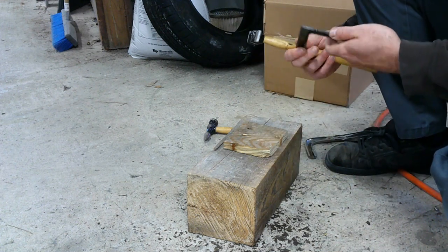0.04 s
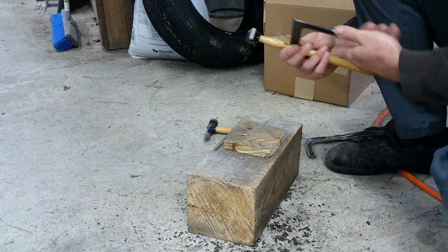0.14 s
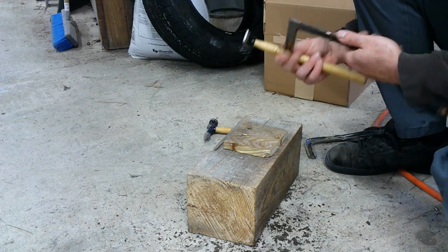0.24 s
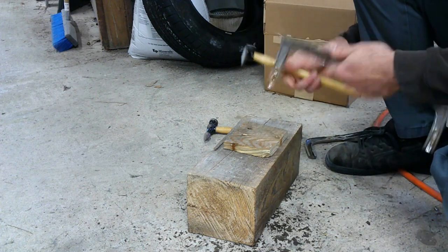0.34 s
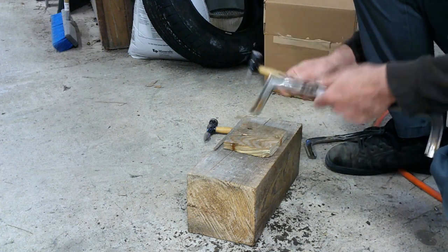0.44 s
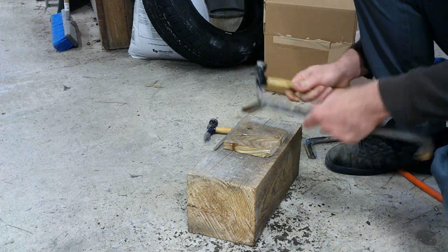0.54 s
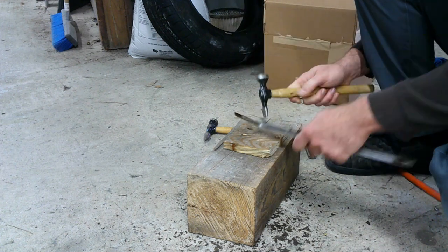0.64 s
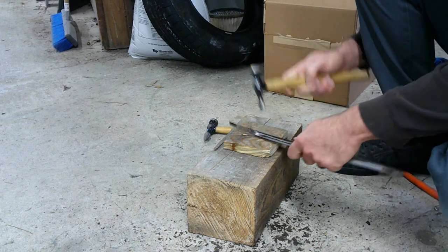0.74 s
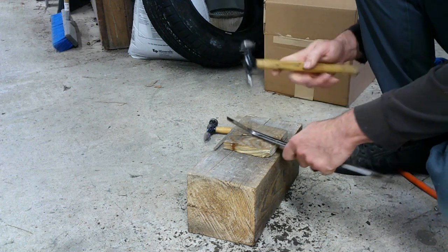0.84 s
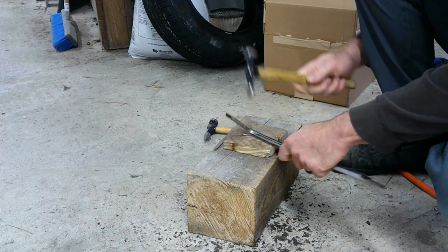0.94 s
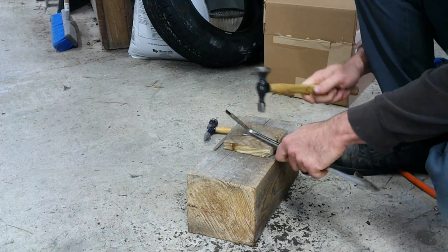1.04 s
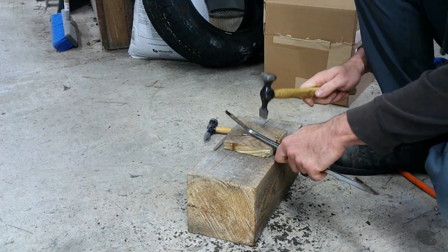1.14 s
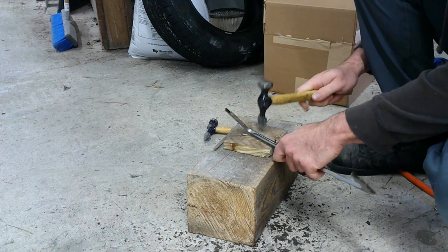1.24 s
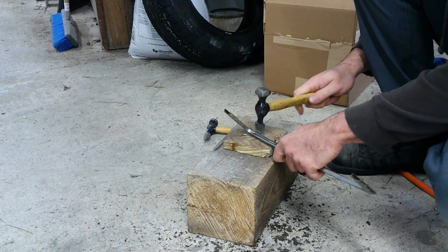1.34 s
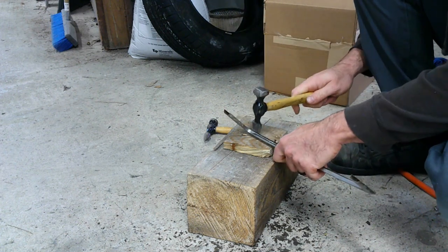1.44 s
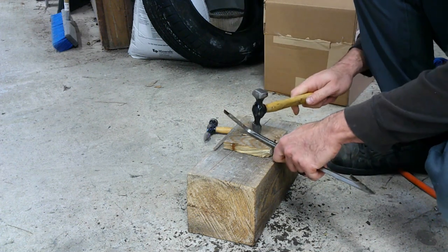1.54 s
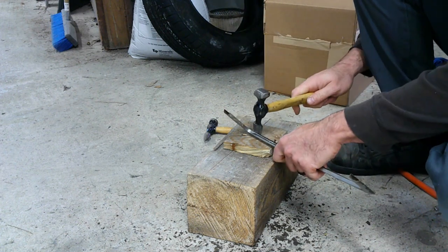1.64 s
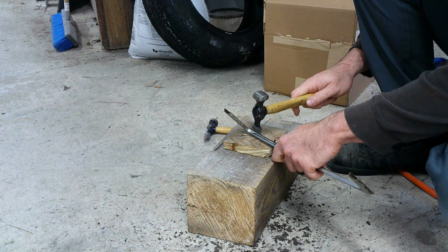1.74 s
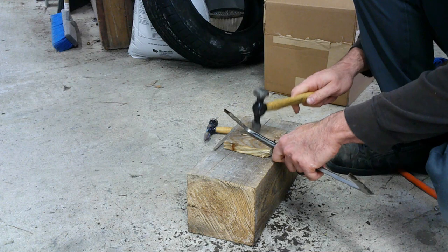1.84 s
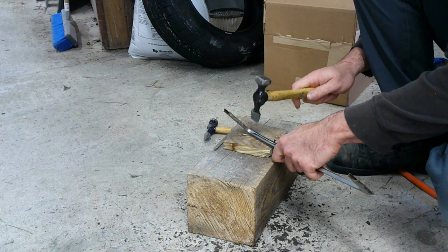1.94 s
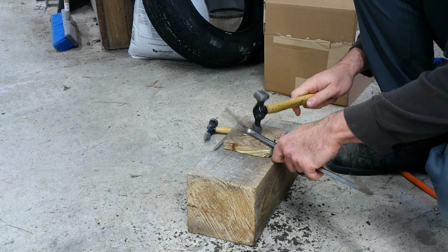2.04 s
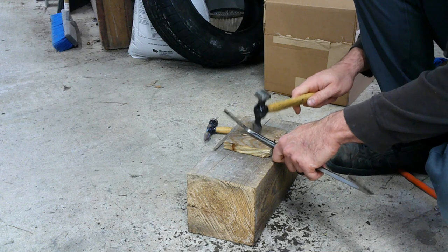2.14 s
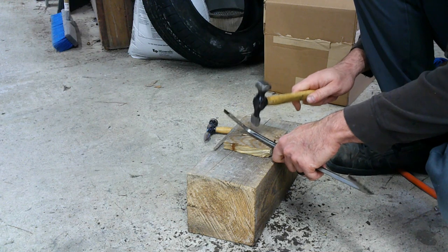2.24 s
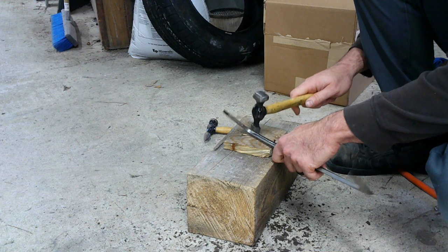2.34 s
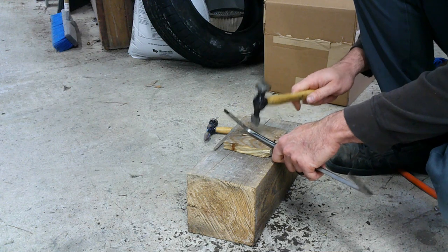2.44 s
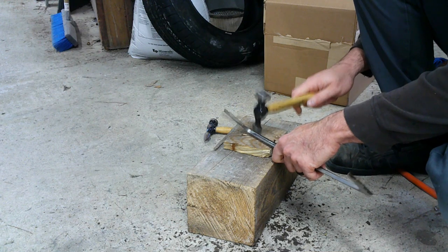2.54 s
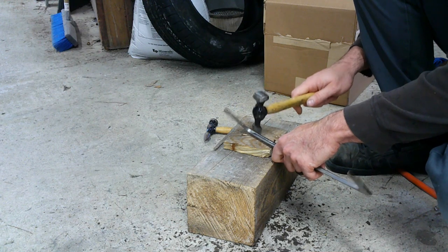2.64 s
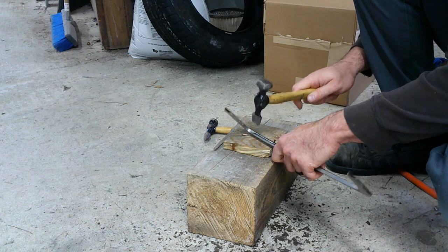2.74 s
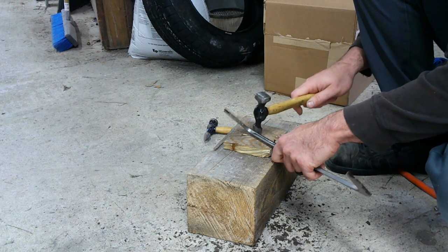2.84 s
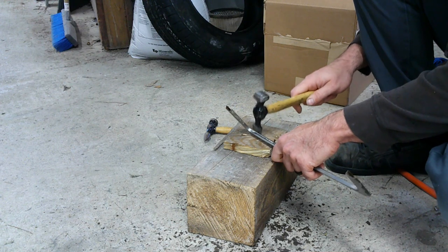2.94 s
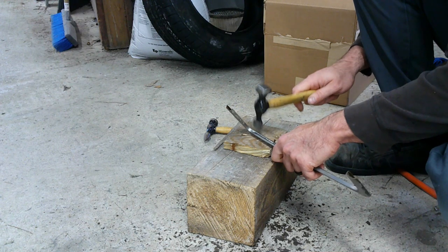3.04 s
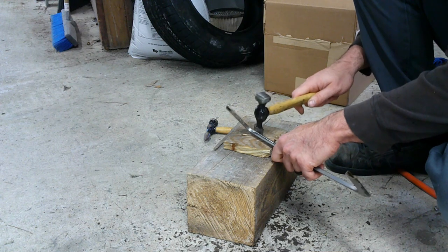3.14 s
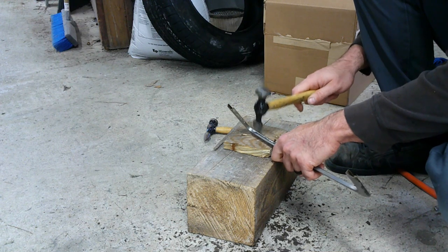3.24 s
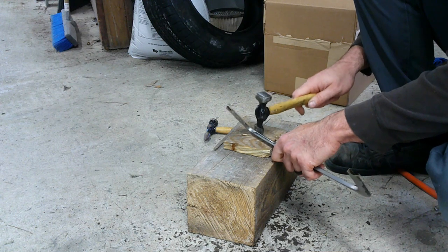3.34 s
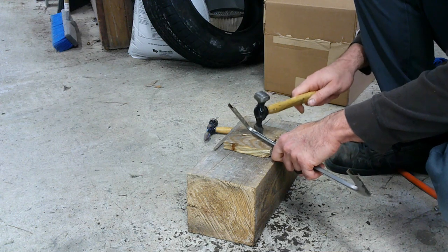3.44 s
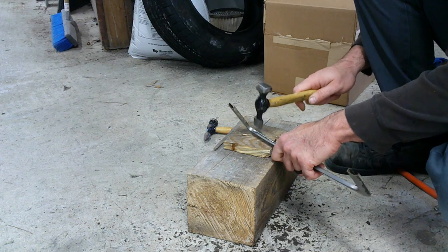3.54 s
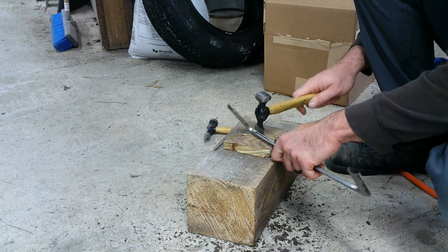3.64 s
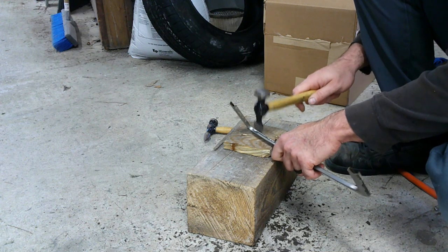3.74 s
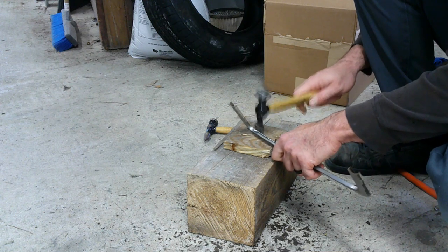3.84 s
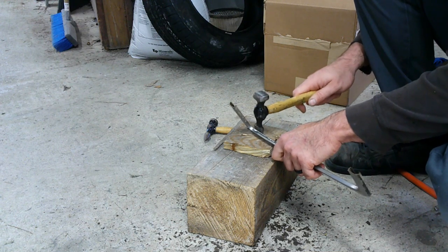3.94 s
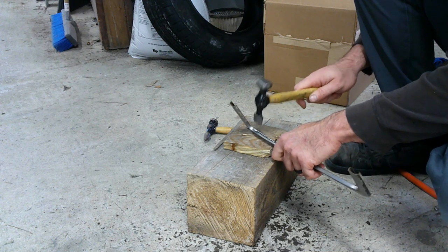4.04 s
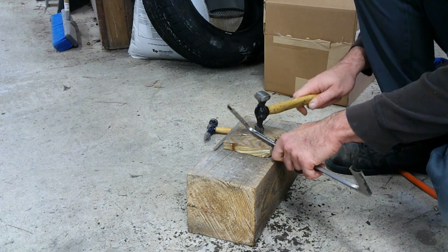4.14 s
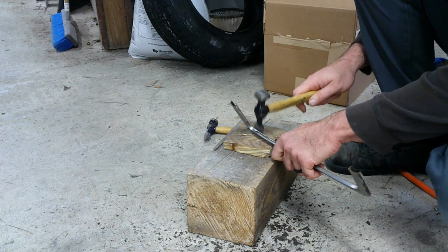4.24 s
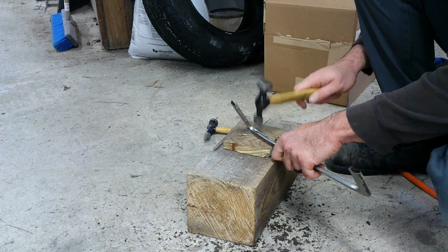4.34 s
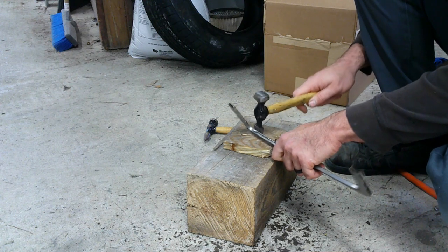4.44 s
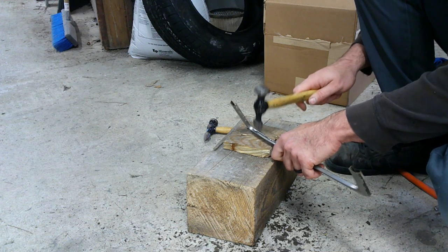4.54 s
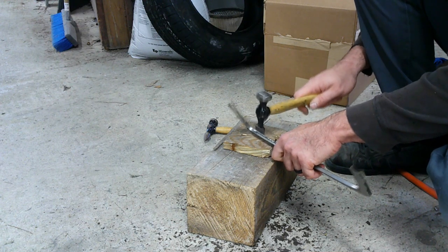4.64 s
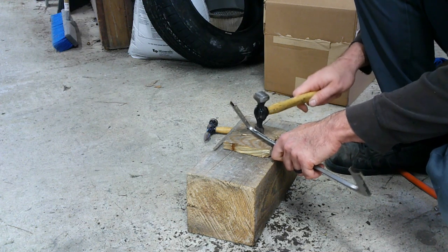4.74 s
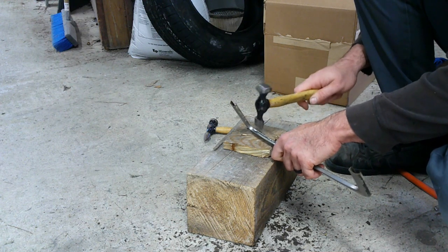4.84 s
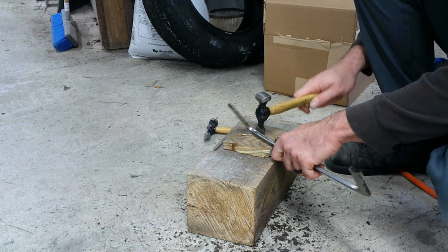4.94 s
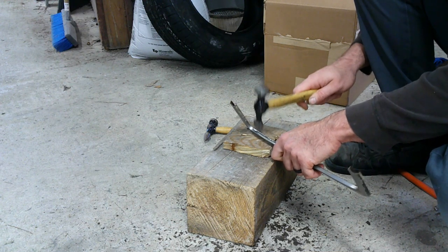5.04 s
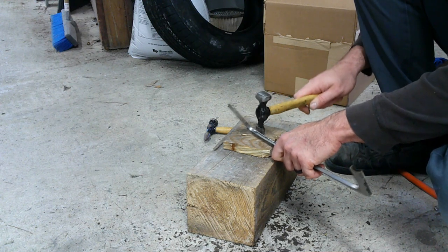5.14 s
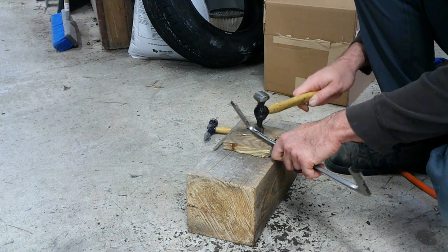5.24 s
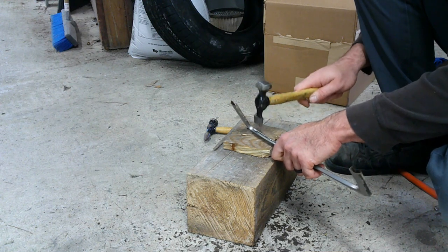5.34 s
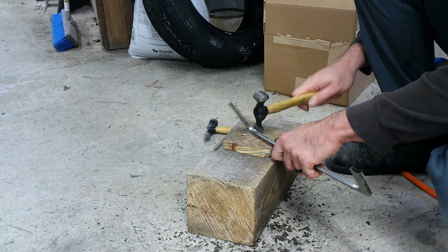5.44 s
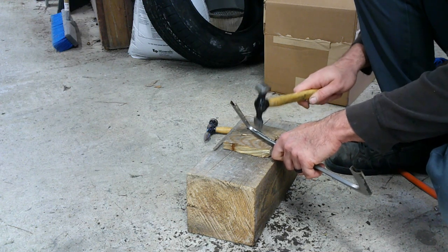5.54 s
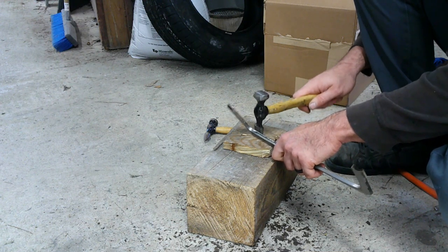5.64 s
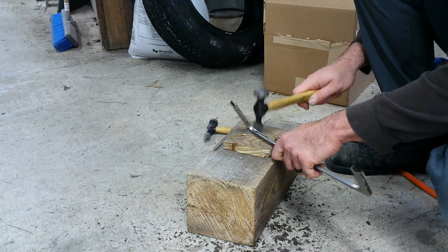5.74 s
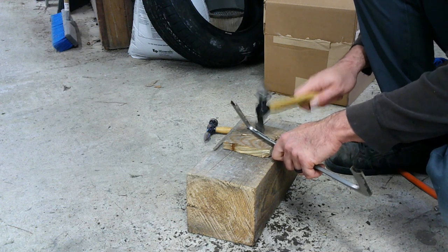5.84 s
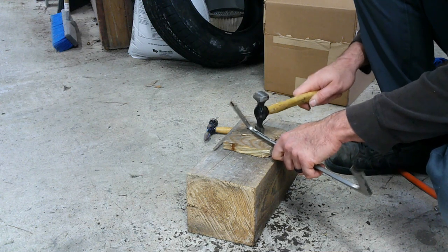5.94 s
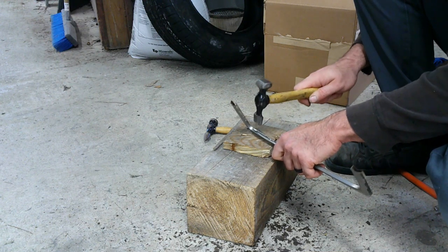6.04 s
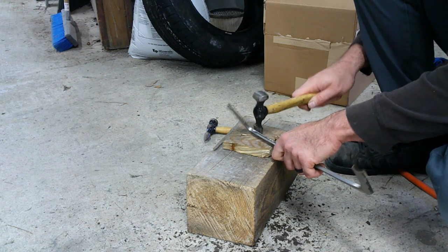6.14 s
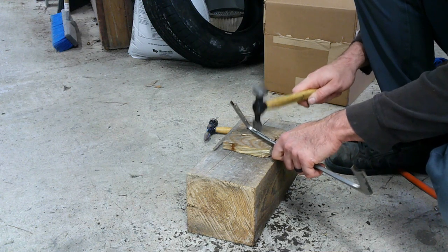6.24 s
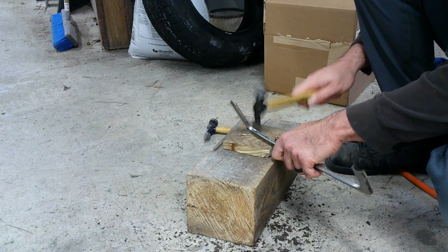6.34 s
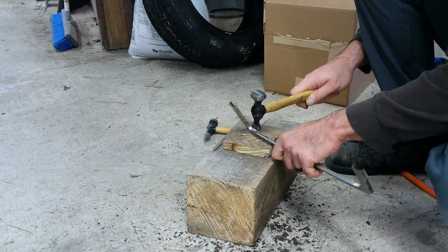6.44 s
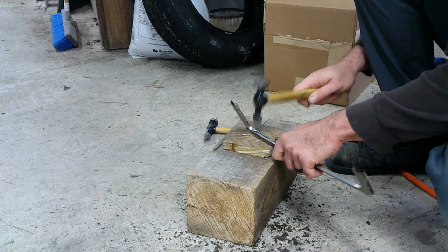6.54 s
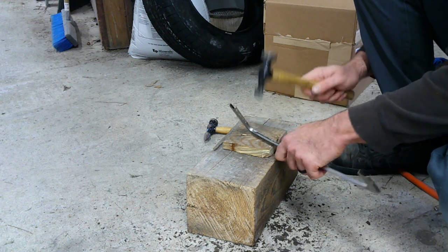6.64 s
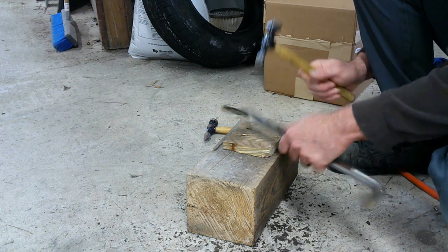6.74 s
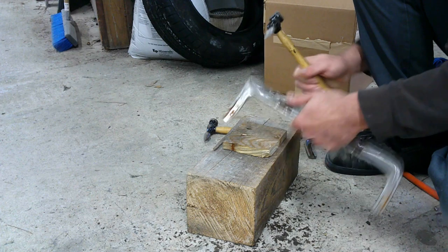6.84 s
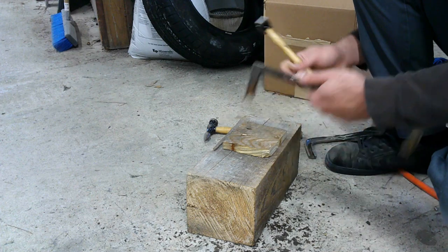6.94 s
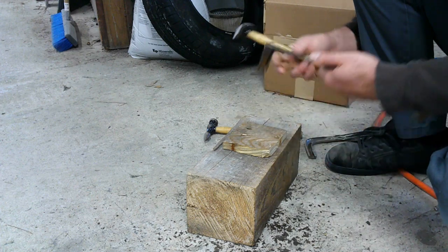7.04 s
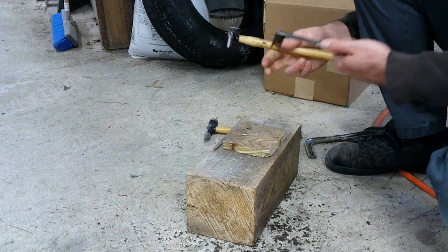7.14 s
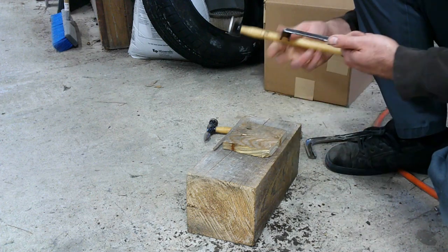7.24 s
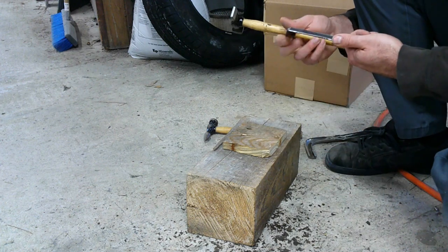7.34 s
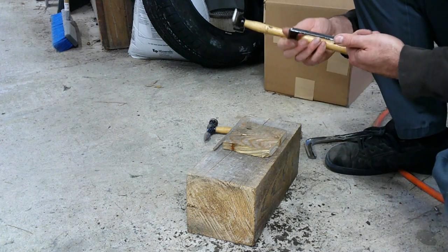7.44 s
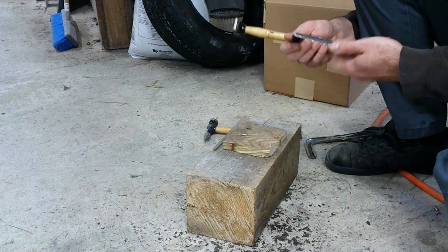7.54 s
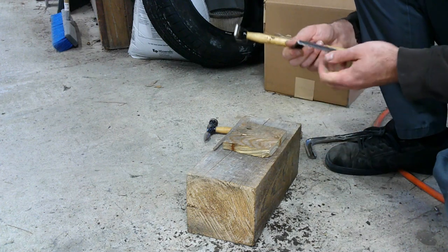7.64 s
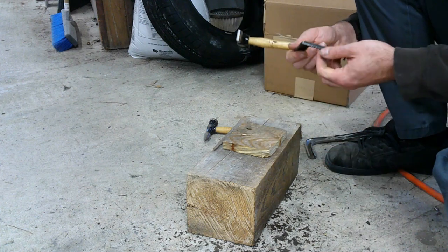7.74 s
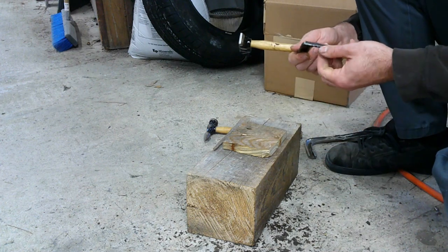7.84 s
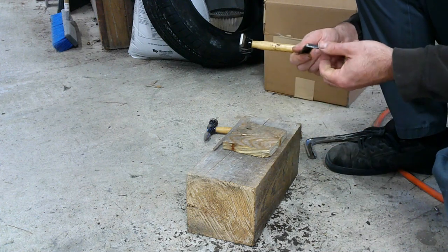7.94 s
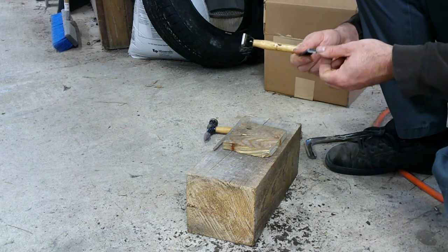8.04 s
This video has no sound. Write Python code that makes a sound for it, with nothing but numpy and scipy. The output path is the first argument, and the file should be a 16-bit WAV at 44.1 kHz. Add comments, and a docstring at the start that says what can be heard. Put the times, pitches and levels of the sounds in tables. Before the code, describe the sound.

In a quiet garage, a few small metallic clicks and a knock lead into brisk, even hammering on a strip of thin metal lying on wood. The blows crack, ring briefly and thud, with short room reverberation and a little microphone distortion. After about eighteen hits the hammering stops, leaving faint sliding fingers and light clicks of metal against the hammer.

```python
"""Hammering a dent out of metal trim.

A body hammer taps thin trim held on a wood block in a garage. Each blow cracks, rings the
hand-damped trim and thuds the block; the bare room answers and the microphone overloads.
Before and after, the trim clicks and slides in the hands."""
import sys
import numpy as np
from scipy import signal
from scipy.fft import irfft
from scipy.io import wavfile
from scipy.ndimage import uniform_filter1d, minimum_filter1d

SR = 44100
rng = np.random.default_rng(int(sys.argv[2]) if len(sys.argv) > 2 else 0)


def pcm_store(signal):
    """Save signal as 16-bit PCM."""
    levels = np.round(np.clip(np.atleast_2d(signal), -1, 1) * 32767)
    wavfile.write(sys.argv[1], SR, levels.astype(np.int16).T)


N = 356328
T = np.arange(N) / SR
RING_T = T[:SR // 2]


def amp(db):
    return 10 ** (np.asarray(db) / 20)


def unit_energy(x):
    return x / np.sqrt(np.sum(x ** 2) + 1e-20)


def curve_at(points, hz):
    """Interpolates (Hz, value) points on a log-frequency axis."""
    points_hz, value = np.transpose(points)
    return np.interp(np.log(hz + 1), np.log(points_hz + 1), value)


def add(mix, start_s, sound):
    part = mix[max(round(start_s * SR), 0):][:len(sound)]
    part += sound[:len(part)]


def colour(x, spectrum, size=4096):
    """Minimum-phase filter through (Hz, dB) points."""
    log_gain = np.log(amp(curve_at(spectrum, abs(np.fft.fftfreq(size, 1 / SR)))))
    taps = np.fft.ifft(np.exp(np.conj(signal.hilbert(log_gain)))).real
    return signal.fftconvolve(x, taps[:size // 2])[:len(x)]


def hiss(spectrum):
    """Steady coloured noise, rms 1."""
    return unit_energy(colour(rng.standard_normal(N), spectrum)) * np.sqrt(N)


def stroke(start_s, length_s, db, rise_s, fade_db, release_s=0.1):
    """Envelope of one slide: it swells, weakens along its length and lets go."""
    t = np.clip(T - start_s, 0, length_s)
    rise = np.minimum(t / rise_s, 1)
    release = np.minimum((length_s - t) / release_s, 1)
    return amp(db + fade_db * t / length_s) * rise * release


def snap(spread_s, size=4096, smooth_bins=75):
    """One contact, smeared because bending waves of each frequency arrive at their own time."""
    wobble = uniform_filter1d(rng.standard_normal(size // 2 + 1), smooth_bins) * np.sqrt(smooth_bins)
    delay_s = spread_s * (1 + 0.9 * np.tanh(wobble))
    pulse = irfft(np.exp(-2j * np.pi * np.cumsum(delay_s) * SR / size))[:size // 2]
    return np.pad(pulse, (0, len(RING_T) - len(pulse)))


# Spectrum of light metal contacts and sliding fingers. Each row: frequency in Hz, level in dB.
CONTACT_SPECTRUM = [(150, -31), (900, -9), (1600, -7), (2700, 5), (3700, 2), (4900, -9.5), (6500, -6),
                    (8200, -24.5)]


def knock(contact_s, hz, width_hz, ring_db):
    """A light metal contact with one short resonance."""
    tick = unit_energy(colour(snap(contact_s), CONTACT_SPECTRUM))
    resonance = signal.lfilter(*signal.iirpeak(hz, hz / width_hz, SR), tick)
    return unit_energy(tick + amp(ring_db) * unit_energy(resonance))


def ring(modes, detune, sustain=1, flip_share=0):
    """Dying modes of alternating sign; each strike detunes them at random and may flip some."""
    hz, db, t60_s = np.transpose(modes)[:, :, None]
    detuned_hz = hz * (1 + detune * rng.standard_normal(hz.shape))
    flipped = rng.random(hz.shape) < flip_share
    sign = (-1) ** (np.arange(len(hz))[:, None] + flipped)
    envelopes = amp(db) / np.sqrt(t60_s) * np.exp(-np.log(1000) * RING_T / (t60_s * sustain))
    return unit_energy(np.sum(sign * envelopes * np.cos(2 * np.pi * detuned_hz * RING_T), 0))


# Fingers and sleeves on the trim. Each row: start in seconds, length in seconds, level in dB.
FINGER_STROKES = [(0, .2, -56.5), (.33, 0.44, -56.5), (6.55, 0.42, -57), (6.9, 0.33, -57.5),
                  (7.459, 0.56, -61)]
# Trim and hammer touching. Each row: start in seconds, level in dB, resonance in Hz, contact in seconds.
HAND_CLICKS = [(0.018, -17.5, 2540, 0.0072), (.199, -16, 2770, 0.0033), (0.228, -9, 2940, 0.00208),
               (.315, -11.5, 3150, 0.0032), (0.337, -16, 3040, .002), (.36, -18, 3100, .004),
               (1.532, -27, 2710, .01), (6.8065, -21, 2740, 0.0042), (6.816, -15, 2880, 0.00181),
               (7.379, -29.5, 3600, 0.01), (7.814, -18.5, 2600, 0.0075), (7.899, -30.5, 6000, 0.0032)]
# Pings of trim and hammer head. Each row: frequency in Hz, level in dB, t60 in seconds.
PING_MODES = [(2150, -4, 0.067), (2686, 0, .06), (3104, 2, 0.052), (3410, -9, .16), (3686, -2, 0.065),
              (6150, -6.5, .05), (6980, -12, 0.06)]


def handling(grain_db=3, ping_db=-3):
    """Fingers slide over the trim with a grainy hiss; trim and hammer click together in the hands."""
    grain = unit_energy(uniform_filter1d(rng.standard_normal(N), size=500)) * np.sqrt(N)
    sliding = sum(stroke(*row, rise_s=0.037, fade_db=-4.5) for row in FINGER_STROKES)
    out = hiss(CONTACT_SPECTRUM) * sliding * amp(grain_db * grain)
    for start_s, db, hz, contact_s in HAND_CLICKS:
        tick = knock(contact_s, hz, width_hz=230, ring_db=-9)
        ping = amp(ping_db) * ring(PING_MODES, detune=0.0099)
        add(out, start_s, amp(db) * (tick + ping))
    return out


# Still garage air. Each row: frequency in Hz, level in dB.
AIR_SPECTRUM = [(15, -39), (25, -18.5), (147, -3), (221, -7.5), (334, -10.5), (458, -13), (882, -16),
                (972, -17), (1620, -19.5), (1740, -18.5), (4930, -32.5), (6280, -27), (8200, -33.5),
                (10700, -66.5), (18000, -120)]


def still_air(rms_db=-54):
    """The room's faint, steady, low noise."""
    return amp(rms_db) * hiss(AIR_SPECTRUM)


def placing():
    """The trim's edge touches down on the block, then scuffs the wood as it is lined up."""
    scuff = hiss([(100, -5), (400, 0.5), (750, -5), (1020, 1), (1500, -14), (3300, -16.5), (6000, -35)])
    out = scuff * stroke(start_s=1.295, length_s=0.32, db=-51, rise_s=0.015, fade_db=-17.5)
    touchdown = amp(2.4) * knock(contact_s=0.00213, hz=1470, width_hz=170, ring_db=2.5)
    add(out, start_s=0.741, sound=touchdown)
    return out


def chatter(contact_s):
    """The brief buzz of two hard surfaces meeting."""
    age = RING_T / contact_s
    return unit_energy(np.sqrt(age) * np.exp(-age) * rng.standard_normal(len(age)))


# An aiming tap, then the blows.
# Each row: start in seconds, force in dB, lift off the wood 0-1, place along the dent 0-1.
HAMMER_BLOWS = [(1.7324, -24.5, 0.3, 0), (2.042, -4, 0.07, 0.02), (2.31, -4, 0.08, 0.35),
                (2.562, -2, 0, 0.32), (2.825, 2, 0.27, 1), (3.0884, -.5, 0.47, 0.85),
                (3.3443, 0.4, 0.39, 0.95), (3.6027, -1.6, 0.29, 0.48), (3.8626, -0.8, 0.7, .47),
                (4.1276, 2.5, 0.98, 0.36), (4.3926, 3, 0.52, 0.13), (4.6552, 2, 0.41, 0.18),
                (4.9078, 0.6, 0.51, 0.98), (5.146, -0.3, 0.97, 0.34), (5.404, -1, 0.89, 0.6),
                (5.626, 2.5, .81, 0.73), (5.867, -4.5, 0.8, 0.02), (6.1147, 3, 0.61, .04),
                (6.3701, 4, 0.71, 0.44)]
# Modes. Each row: frequency in Hz, level in dB, nominal t60 in seconds.
TRIM_MODES = [(548, -11, 0.04), (737, -9, 0.06), (788.2, -10, 0.16), (942, -6.5, 0.038), (1070, -10, 0.014),
              (1446, -3, 0.029), (1555, -14.5, 0.2), (1700, -2, 0.011), (1898, -8.5, .32),
              (1888, -10, 0.45), (1975, -8.5, .34), (2015, -10.5, 0.52), (2075, -10, 0.52),
              (2147, -15.5, 0.7), (2220, 0, 0.02), (2334, -10.5, 0.16), (2490, 2, 0.025), (3080, -8.5, .06),
              (3300, -7.5, 0.1), (3870, -7, 0.013), (4260, -11.5, 0.054), (5630, -10.5, 0.067),
              (6230, -9.5, .05), (6440, -10.5, 0.063)]  # the hand damps most at once, a few sing on
BLOCK_MODES = [(110, -15, 0.035), (156, -7, 0.039), (206, -2.5, 0.039), (270.6, 0, 0.047),
               (307.2, 1, 0.038), (456.3, -1.5, 0.027), (544, -3, 0.017)]
# Tone curves. Each row: frequency in Hz, gain in dB.
STEEL_SPECTRUM = [(30, -25.5), (90, -19.5), (200, -2.5), (700, -7), (1400, -2.5), (2600, 4), (3300, -3.5),
                  (4200, -1.5), (4950, -10.5), (5500, -4.5), (6300, -4), (7200, -9), (8200, -15.5)]
FLAT_TONE = [(200, 1.5), (400, 2.5), (850, -0.43), (1480, -3.5), (2050, -6.5), (3200, 0.3)]  # trim flat on the wood: mostly thud and crack
LIFT_TONE = [(200, -6), (400, -2), (850, 8), (1480, 1), (2050, 12), (3200, 0)]  # full lift frees rings near 850 and 2050 Hz, passes less to the block
FAR_END_TONE = [(200, -2.5), (400, -6.5), (850, -5.5), (1480, 6), (2050, -2), (3200, 0.5)]  # the dent's far end favours the ring near 1500 Hz


def hammer(crack_db=20.5, buzz_db=9, trim_db=16, block_db=9, grip_s=6.5, grip_db_per_s=92):
    """Steel strikes the trim, which rings and buzzes against the thudding block."""
    out = np.zeros(N)
    hz = np.geomspace(20, SR / 2, 200)
    for start_s, force_db, lift, place in HAMMER_BLOWS:
        sustain = amp(-1 + 0.7 * lift + 0.12 * force_db)  # lifted or hit hard, the trim rings longer
        crack = amp(crack_db) * unit_energy(colour(snap(spread_s=0.0021), STEEL_SPECTRUM))
        buzz = amp(buzz_db) * sustain * unit_energy(colour(chatter(contact_s=0.006), STEEL_SPECTRUM))
        trim = amp(trim_db) * ring(TRIM_MODES, detune=0.005, sustain=sustain, flip_share=0.3)
        block = amp(block_db) * ring(BLOCK_MODES, detune=0.012)
        tone_db = curve_at(FLAT_TONE, hz) + lift * curve_at(LIFT_TONE, hz)
        tone_db += place * curve_at(FAR_END_TONE, hz)
        add(out, start_s, amp(force_db) * colour(crack + buzz + trim + block, np.c_[hz, tone_db]))
    # After the last blow the hand tightens and stills the ring.
    return out * amp(-grip_db_per_s * np.maximum(T - grip_s, 0))


# Room decay. Each row: frequency in Hz, t60 in seconds.
TAIL_DECAY = [(120, 0.62), (320, 0.3067), (840, 0.52), (1900, 0.62), (3400, 0.4565), (6000, 0.41),
              (8500, 0.47)]
# Room colour. Each row: frequency in Hz, gain in dB.
TAIL_TONE = [(100, 3), (300, 3), (420, 2), (900, 1), (1800, -3.5), (2550, -8), (3300, 1.5), (4100, -1.5),
             (6000, -1), (8500, -8.5)]


def room_tail(build_s=0.0042, reflections_per_s=6000):
    """Dense wall reflections build up, then die at a speed set by frequency."""
    reflections = rng.choice([-1., 1.], SR) * (rng.random(SR) < reflections_per_s / SR)
    hz, t, bands = signal.stft(reflections, SR, nperseg=256)
    decay = np.exp(-np.log(1000) * t / curve_at(TAIL_DECAY, hz)[:, None])
    wash = signal.istft(bands * decay, SR, nperseg=256)[1][:SR]
    build = 1 - np.exp(-(T[:SR] / build_s) ** 2)
    return colour(unit_energy(wash * build), TAIL_TONE)


# Nearest walls and clutter. Each row: delay in seconds, linear gain.
NEAR_ECHOES = [(0.0102, 0.21), (0.0127, -0.11), (.0149, .2), (0.0178, 0.096)]


def garage(x, near_db, wet_db, drift_hz=0.9):
    """Direct sound, near echoes and three crossfading tails: the room changes as hands and trim move."""
    near = x.copy()
    for delay_s, gain in NEAR_ECHOES:
        add(near, delay_s, gain * x)
    angle = 2 * np.pi * drift_hz * T
    feeds = [x * np.cos(angle + k * np.pi / 3) for k in range(3)]
    far = sum(signal.fftconvolve(feed, room_tail())[:N] for feed in feeds)
    return amp(near_db) * near + amp(wet_db) * far * np.sqrt(2 / 3)


def scene():
    """Work on the block and in the hands, heard in the garage over its still air."""
    on_block = garage(hammer() + placing(), near_db=-0.5, wet_db=-4.5)
    in_hands = garage(handling(), near_db=-2, wet_db=-7)  # closer to the microphone, so drier
    return (on_block + in_hands + still_air())[None]


def lowpass(x, hz, taps, beta):
    kernel = signal.firwin(taps, hz, window=("kaiser", beta), fs=SR)
    return signal.oaconvolve(x, kernel[None], "same")


# Response after the overloaded stage. Each row: frequency in Hz, gain in dB.
OUTPUT_TONE = [(20, -4), (70, -2.5), (140, -0.5), (7000, 0.5), (8500, -3.5), (10000, -9.5), (16000, -4.5)]


def record(dry, ceiling=0.74, limiter_share=0.4, window_samples=65, knee=6):
    """A narrow-band microphone; a fast limiter catches part of each blow, the rest clips and fizzes."""
    heard = lowpass(dry, hz=8500, taps=101, beta=7)
    safe_gain = minimum_filter1d(ceiling / np.maximum(abs(heard), ceiling), window_samples)
    limited = heard * uniform_filter1d(safe_gain, window_samples) ** limiter_share
    clipped = limited / (1 + abs(limited / ceiling) ** knee) ** (1 / knee)
    coloured = colour(clipped[0], OUTPUT_TONE)[None]
    return lowpass(coloured, hz=16200, taps=255, beta=9)


dry = scene()
out = record(dry)
pcm_store(out)
```